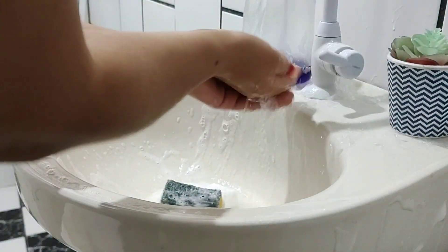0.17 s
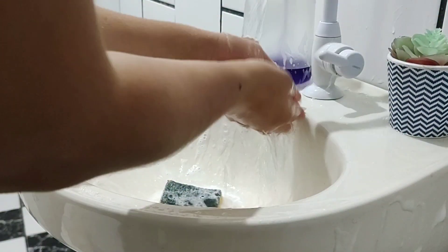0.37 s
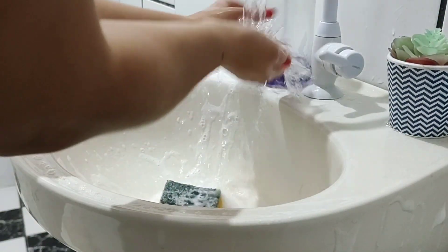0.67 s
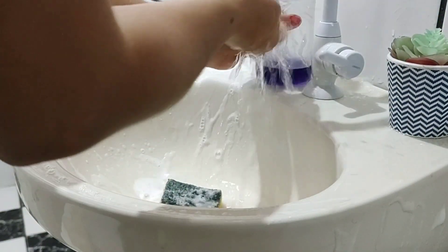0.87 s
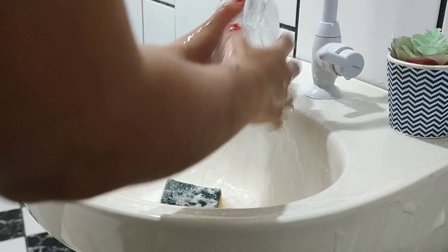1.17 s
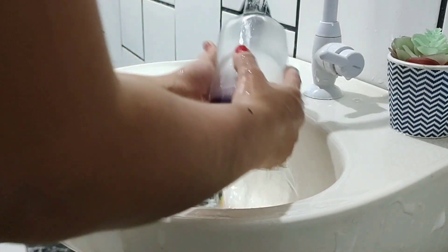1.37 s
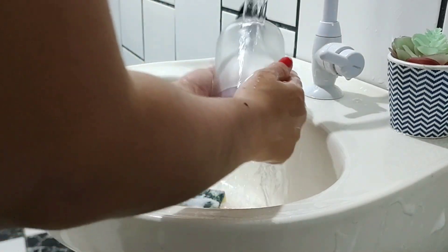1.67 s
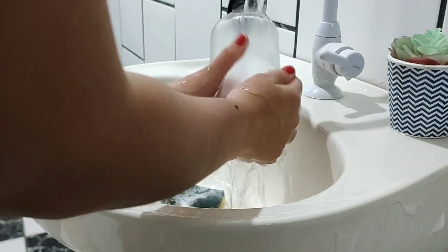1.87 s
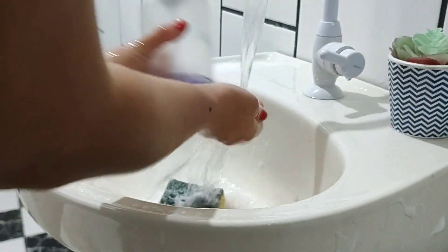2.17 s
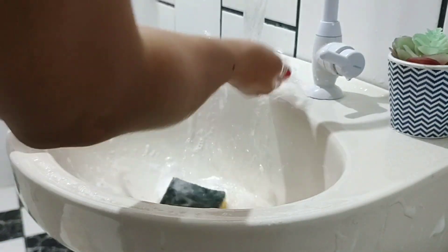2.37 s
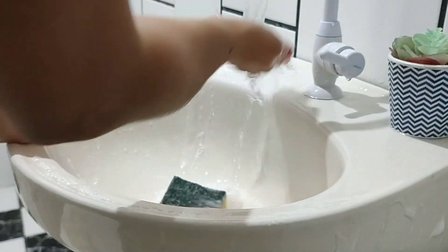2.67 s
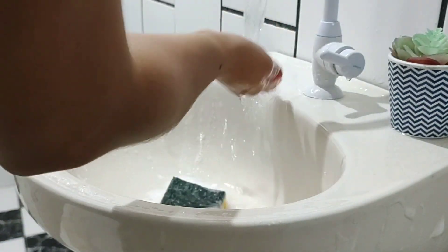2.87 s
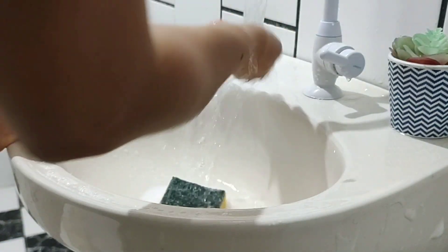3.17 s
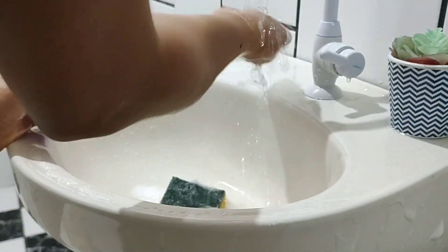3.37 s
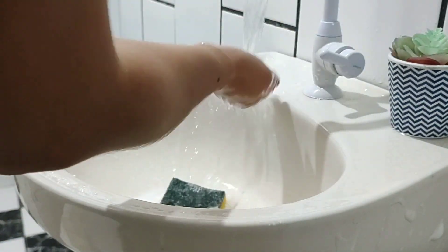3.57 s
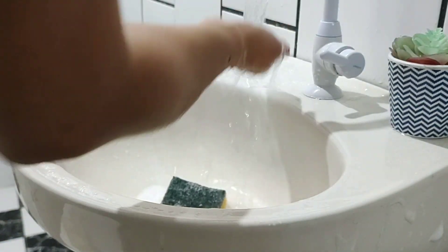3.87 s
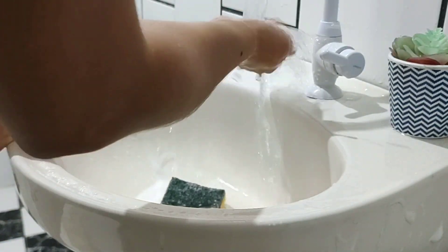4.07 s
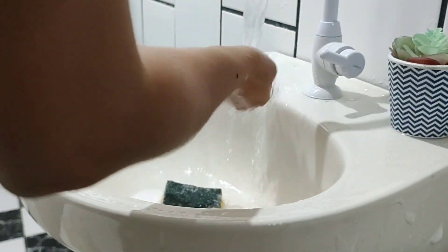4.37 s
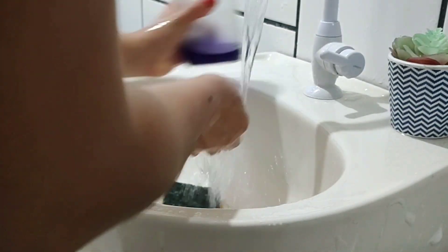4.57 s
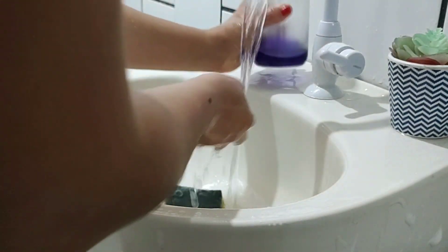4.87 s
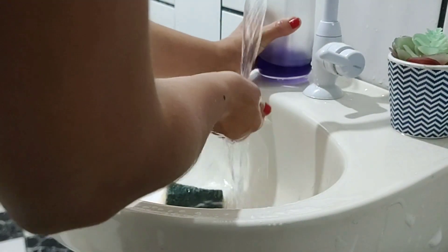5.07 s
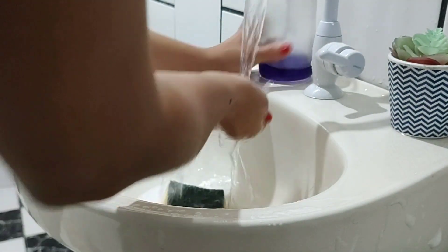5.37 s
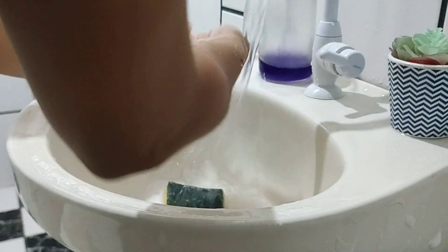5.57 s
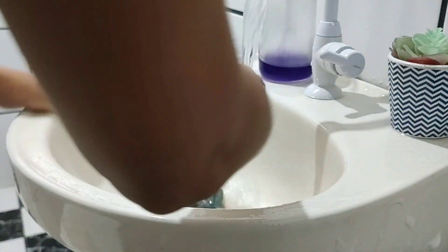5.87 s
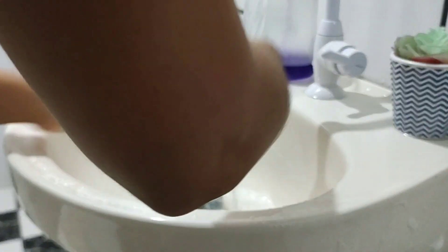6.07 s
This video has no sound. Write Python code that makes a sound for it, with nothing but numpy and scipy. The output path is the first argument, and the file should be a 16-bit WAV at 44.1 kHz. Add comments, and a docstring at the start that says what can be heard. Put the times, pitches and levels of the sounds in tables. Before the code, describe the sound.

Close up in a small tiled bathroom, hands break a stream of tap water, throwing irregular splashes, spray and little bubbles into the basin. A bottle gives a short hollow scrape early on. The water grows lighter, then swells again as the bottle is put down hard, making the sink thud and ring briefly. Low gulps come from the drain, strongest toward the end.

```python
"""Tap water breaks over moving hands and splashes into a ceramic basin in a tiled bathroom. Each splash
is a swell of noisy wash and spray with a froth of tiny ringing bubbles. Drops burst on the glaze, large
bubbles sing, and slugs of water thump the air over the drain in a low gurgle. A soap bottle judders off
the rim and is later set down hard: the basin thuds and the tiles ring on. The plumbing hums faintly."""
import sys
import numpy as np
from scipy import signal
from scipy.fft import rfft, irfft, next_fast_len
from scipy.io import wavfile
from scipy.ndimage import uniform_filter1d, map_coordinates

SR = 44100
rng = np.random.default_rng(int(sys.argv[2]) if len(sys.argv) > 2 else 0)


def put_to_file(sound):
    """Save the sound as 16-bit audio at rate SR, in the file named by the first command-line argument."""
    columns = np.atleast_2d(sound).T  # one column per channel
    safe = np.clip(columns, -1, 1)
    whole_steps = np.round(safe * 32767)
    wavfile.write(sys.argv[1], SR, whole_steps.astype(np.int16))


N = 273861


def amp(db):
    return 10 ** (np.asarray(db) / 20)


def unit_rms(x):
    return x / np.sqrt(np.mean(x ** 2) + 1e-20)


def at_pitch(points, hz):
    """Read (frequency, value) points along a log frequency axis."""
    freqs, values = np.transpose(points)
    return np.interp(np.log(hz + 1), np.log(freqs + 1), values)


def automation(rows):
    """One curve per column after the time, with a value for every sample."""
    times, *columns = np.transpose(rows)
    return [np.interp(np.arange(N) / SR, times, column) for column in columns]


def wobble(rate):
    """A smooth random curve, rate knots a second."""
    return map_coordinates(rng.standard_normal(int(N * rate / SR) + 4), [np.arange(N) * rate / SR])


def swells(start, hold, peak, rise_s, fall_db_per_s):
    """Summed power envelopes: a quick attack, a hold, then a release that falls steadily in dB."""
    grid = np.arange(0, N / SR + .002, .001)
    age = grid - start[:, None]
    released = np.maximum(age - rise_s - np.abs(hold)[:, None], 0)
    gain = np.clip(age / rise_s, 0, 1) * amp(-fall_db_per_s * released)
    return np.interp(np.arange(N) / SR, grid, peak @ gain ** 2)


def filtered(x, response):
    """Shape x with a complex frequency response."""
    size = next_fast_len(x.shape[-1] + SR // 2)
    return irfft(rfft(x, size) * response(np.fft.rfftfreq(size, 1 / SR)), size)[..., :x.shape[-1]]


def resonate(x, modes):
    """Parallel (centre, stage width, gain) resonators, each two band-pass stages for steep skirts."""
    band = lambda f, hz, width: 1j * f * width / (hz * hz - f * f + 1j * f * width)
    return filtered(x, lambda f: sum(amp(db) * band(f, hz, width) ** 2 for hz, width, db in modes))


# Stereo image: (frequency [Hz], left-right correlation [-1..1])
STEREO_IMAGE = [(30, 0.91), (70, 0.55), (130, 0.82), (330, 0.91), (480, 0.79), (700, -0.027),
                (1400, -0.088), (15000, -0.0042)]
def stereo(pair):
    """Two unrelated signals become left and right, centred in the bass and wide above it."""
    angle = lambda hz: np.arccos(np.clip(at_pitch(STEREO_IMAGE, hz), -1, 1)) / 2
    mid, side = filtered(pair, lambda hz: np.array([np.cos(angle(hz)), np.sin(angle(hz))]))
    return np.array([mid + side, mid - side])


def resonant_noise(modes, drive=1):
    """Stereo noise of rms 1: hiss scaled by drive excites the resonators."""
    return unit_rms(stereo(resonate(drive * rng.standard_normal((2, N)), modes)))


def rush(spectrum, patchy_db):
    """Coloured stereo noise of rms 1 that flickers in patches of time and frequency."""
    bins = signal.stft(rng.standard_normal((2, N)), nperseg=256)[2]
    patches = uniform_filter1d(rng.standard_normal(bins.shape[1:]), size=6, axis=0)
    patches = uniform_filter1d(patches, size=5, axis=1)
    pair = signal.istft(bins * amp(patchy_db * unit_rms(patches)), nperseg=256)[1][:, :N]
    return unit_rms(stereo(filtered(pair, lambda hz: amp(at_pitch(spectrum, hz)))))


def blips(start, hz, gain, cycles, rise):
    """Bubble tones: sines that peak after `cycles` periods and climb as the bubble nears the surface."""
    t = np.arange(min(900, int(8 * cycles / hz.min() * SR))) / SR
    age = t * hz[:, None] / cycles
    wave = np.sin(2 * np.pi * hz[:, None] * t * (1 + rise * age / 2)) * age * np.exp(1 - age)
    at = (start * SR).astype(int)[:, None] + np.arange(len(t))
    return np.bincount(at.ravel(), (gain[:, None] * wave).ravel(), N + len(t))[:N]


def swarm(count, hz, octaves, scatter_db, cycles, rise):
    """A stereo cloud of random bubbles, rms 1, scattered around a steady or moving pitch."""
    centre, pair = np.broadcast_to(hz, N), []
    for _ in range(2):
        when, detune, size = rng.random(count), rng.standard_normal(count), rng.exponential(size=count)
        pitch = np.clip(centre[(when * N).astype(int)] * 2 ** (octaves * detune), 100, 15000)
        pair.append(blips(when * N / SR, pitch, amp(scatter_db * np.minimum(size, 3.5)), cycles, rise))
    return unit_rms(stereo(np.array(pair)))


# Reverb of the tiled room: (frequency [Hz], time to fall 60 dB [s])
TILE_DECAY = [(130, 1), (350, 0.63), (900, 0.75), (2000, 0.72), (3200, 0.66), (9000, 0.29)]
def tiles(send):
    """Reflections blur into a noise tail in which each frequency dies at its own speed."""
    hz, t, bins = signal.stft(rng.standard_normal((2, SR)), SR, nperseg=256)
    decay = amp(-60 * t / at_pitch(TILE_DECAY, hz)[:, None])
    tail = stereo(signal.istft(bins * decay, SR, nperseg=256)[1])
    return signal.fftconvolve(send, tail / np.linalg.norm(tail[0]), axes=1)[:, :N]


# Tone of the background noise: (frequency [Hz], relative level [dB])
BACKGROUND_EQ = [(65, -30), (110, 9), (400, 0.5), (620, 0), (1000, 2), (1090, -2), (2160, -13.5),
                 (5530, -11), (13300, -33), (14700, -14), (16000, -1.5)]
def background_noise():
    """A soft, steady background of low room rumble and faint hiss lies under everything."""
    return amp(-67) * rush(BACKGROUND_EQ, patchy_db=1.5)


# Hums of the plumbing: (centre [Hz], stage width [Hz], level [dB])
PIPE_HUMS = [(72.6, 21, -79), (527, 20, -82), (950, 12, -82)]
def pipes():
    """The plumbing hums faintly in narrow bands of noise."""
    return sum(amp(db) * resonant_noise([(hz, width, 0)]) for hz, width, db in PIPE_HUMS)


def gulp_power(cues):
    """Power envelope of gulp-like swells, one per (time, hold, level) cue."""
    start, hold, db = np.transpose(cues)
    return swells(start, hold, amp(db) ** 2, rise_s=0.036, fall_db_per_s=112)


# Swells of a faint hollow tone: (time [s], hold [s], level [dB])
HOLLOW_SWELLS = [(2.307, .04, -64), (2.423, 0.025, -63), (2.55, 0.038, -70.5)]
def hollow_tone(hz=947, width_hz=24):
    """A narrow band of noise swells like a gulp."""
    return np.sqrt(gulp_power(HOLLOW_SWELLS)) * resonant_noise([(hz, width_hz, 0)])


# Resonances of the air over the drain: (centre [Hz], stage width [Hz], relative level [dB])
DRAIN_MODES = [(278, 177, 5), (148, 25, 1), (69, 18, -11)]
# Slugs of water reaching the drain: (time [s], hold [s], level [dB])
DRAIN_GULPS = [(0.07, 0.039, -64.5), (0.31, 0.1, -76), (0.55, 0.03, -63), (0.983, 0.12, -58),
               (1.09, 0.078, -62), (1.32, 0.063, -56), (2.209, 0.073, -59.5), (2.444, 0.025, -74),
               (2.854, 0.028, -70.5), (3.244, 0.14, -67.5), (3.656, 0.033, -63.5), (4.05, 0.046, -74),
               (4.447, 0.025, -65), (4.616, 0.17, -58), (4.79, 0.2, -58.5), (5.214, 0.32, -51),
               (5.678, 0.045, -45.5), (5.78, 0.042, -51.5), (6.017, 0.063, -57)]
def gurgle(floor_db=-81):
    """Uneven slugs of water thump the air over the drain."""
    level = np.sqrt(gulp_power(DRAIN_GULPS) + amp(floor_db) ** 2)
    return level * resonant_noise(DRAIN_MODES, drive=amp(0.35 * wobble(64)))


# Body of the soap bottle: (centre [Hz], stage width [Hz], relative level [dB])
BOTTLE_MODES = [(443, 54, 0.5), (521, 107, -0.5), (780, 340, -0.5), (943, 91, -14), (1145, 220, -14),
                (1915, 150, -9.5)]
# Its judder along the rim: (time [s], scrape level [dB], note level [dB])
SLIDE_LEVELS = [(.945, -58, -74), (.955, -40, -52), (.99, -50, -60), (1.01, -49, -42), (1.04, -36.5, -45),
                (1.065, -43.5, -56), (1.09, -39.5, -57), (1.135, -40.5, -42), (1.15, -45.5, -55),
                (1.25, -93, -85)]
def bottle_slide(note_hz=505):
    """Rough slips on the rim excite the bottle's body, along with a wavering hollow note."""
    t = np.arange(N) / SR
    moving = (t > SLIDE_LEVELS[0][0]) & (t < SLIDE_LEVELS[-1][0])
    scrape = resonant_noise(BOTTLE_MODES, drive=amp(1.2 * wobble(70.3)))
    pitch = note_hz * (1 + .03 * wobble(30))
    note = np.sqrt(2) * np.sin(2 * np.pi * np.cumsum(pitch) / SR) * amp(2.5 * wobble(59.8))
    scrape_gain, note_gain = amp(automation(SLIDE_LEVELS))
    return moving * (scrape_gain * scrape + note_gain * note)


# The bottle landing: (time [s], strength [dB])
BOTTLE_HITS = [(5.229, -5.5)]
# Dull thud of the basin: (centre [Hz], stage width [Hz], gain [dB])
THUD_MODES = [(130, 17, -12), (314, 78, -5.5), (490, 173, -2.5), (657, 91, -12), (800, 450, -4),
              (1925, 420, -6), (2700, 800, -17.5), (3730, 580, -22), (5060, 120, -24)]
# Ringing partials of the basin: (pitch [Hz], level relative to the hit [dB])
RING_MODES = [(326, -33), (411, -30), (447, -27), (793, -31), (855, -28), (887, -29), (1227, -27),
              (1782, -30), (1928, -23), (1965, -24), (2035, -24), (2143, -25), (3149, -32)]
def bottle_landing(attack_s=0.0058, left_lag_s=0.00036):
    """One hard blow on the ceramic gives a broad thud and a shimmering ring, returned separately."""
    t = np.arange(N) / SR
    blows, ring = np.zeros(N), np.zeros((2, N))
    for start, hit_db in BOTTLE_HITS:
        blows[round(start * SR)] = amp(hit_db + 35.5)  # narrow modes pass on little of a single blow
        age = np.maximum(t - start - np.array([[left_lag_s], [0]]), 0)
        attack = 1 - np.exp(-age / attack_s)
        for hz, mode_db in RING_MODES:
            t60_s = 0.54 * (2000 / hz) ** 0.22  # lower modes last longer
            level = amp(mode_db + hit_db + 2.1 * wobble(23) - 60 * age / t60_s)
            ring += attack * level * np.sin(2 * np.pi * (hz * age + rng.random()))
    return resonate(blows, THUD_MODES), ring


def closing_cavity(time_s=3.3, hz=2000, db=-48.5):
    """One closing cavity chirps upward."""
    return blips(np.array([time_s]), np.array([hz]), amp([db]), cycles=3.6, rise=.45)


# Large single bubbles: (time [s], relative level [dB], pitch [Hz])
LARGE_BUBBLES = [(0.067, -50, 827), (0.071, -39, 1410), (0.084, -35.5, 1600), (0.108, -45.5, 793),
                 (0.123, -47, 987), (0.2792, -42, 2320), (0.353, -47, 1400), (0.394, -35, 1900),
                 (0.4264, -41, 1940), (0.4763, -41.5, 1400), (0.647, -39.5, 1650), (1.274, -43, 1114),
                 (1.373, -40.5, 1320), (1.6727, -46, 3820), (1.74, -33, 4440), (1.8068, -35.5, 3280),
                 (1.991, -45.5, 1390), (2.0409, -30.5, 2200), (2.0553, -34, 2260), (2.071, -31.5, 3720),
                 (2.0899, -39, 1690), (2.593, -40, 2350), (2.752, -52.5, 1280), (3.0873, -44.5, 1544),
                 (3.221, -55.5, 1250), (3.87, -53.5, 1240), (3.908, -49, 2280), (4.074, -47.5, 3600),
                 (4.476, -53.5, 1380), (4.5916, -49.5, 1080), (4.6177, -46.5, 1426), (4.654, -48, 1500),
                 (4.689, -46, 1160), (4.752, -43, 1750), (4.931, -40, 3920), (5.025, -42, 3930),
                 (5.1387, -42, 1920), (5.178, -39.5, 4120), (5.614, -38, 1670), (5.937, -40.5, 2300),
                 (6.0224, -35, 2070)]
# Deep bubbles sit right, small ones left: (pitch [Hz], left over right [dB])
BUBBLE_PAN = [(1100, -19.5), (1500, -12.5), (2300, 5), (4000, 12)]
def bubbles():
    """Each large bubble sings once and sheds five weaker ones of nearly its size."""
    start, db, hz = np.transpose(LARGE_BUBBLES)[..., None]
    draws = rng.random((len(start), 3, 6))
    draws[:, :, 0] = [0, .5, 0]  # the parent is on time, in tune and the loudest
    delay_s = .045 * draws[:, 0]
    pitch = hz * 2 ** (0.31 * (draws[:, 1] - .5))
    level = amp(db - 3 - 150 * delay_s - 13 * np.sqrt(draws[:, 2]))
    pan_db = at_pitch(BUBBLE_PAN, hz)
    onsets = (start + delay_s).ravel()
    return np.array([blips(onsets, pitch.ravel(), (level * side).ravel(), cycles=2.33, rise=0.035)
                     for side in amp([pan_db / 2, -pan_db / 2])])


# Drops hitting the glaze: (time [s], relative level [dB], fizz centre [Hz])
GLAZE_DROPS = [(0.054, -32, 3030), (0.251, -34.5, 5180), (0.495, -37, 5500), (0.5298, -29, 6500),
               (0.83, -32.5, 5550), (0.857, -30, 6900), (0.932, -34.5, 5300), (1.6704, -34, 7400),
               (1.7165, -41, 5500), (1.7383, -33, 4580), (1.7864, -39, 10500), (2.0187, -40, 4230),
               (2.1136, -49, 7600), (2.471, -34, 6100), (2.591, -35, 7600), (2.7304, -40, 5600),
               (2.9069, -36, 3900), (3.472, -46, 7700), (3.5573, -42, 5360), (3.575, -43, 7500),
               (3.712, -48, 8000), (3.818, -38.5, 8220), (3.87, -39.5, 7600), (3.9285, -43, 9800),
               (3.9456, -42, 4650), (3.9583, -39, 3960), (3.98, -38.5, 4150), (4.2596, -42, 3230),
               (4.4696, -52, 5300), (5.6335, -30.5, 6270), (5.873, -35, 11400), (5.909, -42, 11900),
               (6.0397, -38.5, 5640), (6.1014, -37, 4200), (6.1285, -49, 3860)]
def drops(slap_t60_s=.006, fizz_t60_s=.055):
    """Each drop bursts in a sharp slap with a brief fizz of its own colour."""
    track, t = np.zeros((2, N + SR)), np.arange(SR // 8) / SR
    for start, db, hz in GLAZE_DROPS:
        slap = amp(-3 - 60 * t / slap_t60_s) * np.sign(rng.standard_normal(len(t)))
        fizz = amp(-7 - 60 * t / fizz_t60_s) * rng.standard_normal((2, len(t)))
        burst = resonate(slap, [(9100, 14700, 0)]) + resonate(fizz, [(hz, 0.39 * hz, 0)])
        at = round(start * SR)
        track[:, at:at + len(t)] += amp(db + 3.5) * burst
    return track[:, :N]


# Wash, the midrange body of the water: (frequency [Hz], relative level [dB])
WASH_EQ = [(240, -37), (400, -1), (607, -13.5), (808, -2.5), (1290, 2), (2410, 3), (3220, -3.5),
           (6580, -10), (9000, -41), (11700, -18), (19800, -120)]
# Spray, its bright top: (frequency [Hz], relative level [dB])
SPRAY_EQ = [(1470, -15.5), (2500, -3), (4680, 2.5), (6110, 3), (10300, 0.5), (12500, -1.5), (14900, -2.5),
            (15500, -5.5)]
# Water running on between splashes: (time [s], wash level [dB], spray level [dB])
TRICKLE_LEVELS = [(0, -63, -57), (.9, -57, -59), (1.6, -58, -61), (1.95, -62, -51), (2.7, -62, -61.5),
                  (3.35, -66, -67), (4.1, -65.5, -62.5), (4.36, -68.5, -66.5), (4.9, -63, -59.5),
                  (5.4, -51, -64), (5.85, -60, -58.5), (6.21, -57, -83)]
# The hands throw the stream onto the glaze:
# (time [s], hold [s], wash level [dB], spray level [dB], froth level [dB], bubble pitch [Hz])
HAND_SPLASHES = [(-.03, 0.052, -45, -50.5, -49, 2430), (0.053, 0.028, -43.5, -44.5, -50, 1690),
                 (0.248, 0.021, -51.5, -51.5, -58.5, 3080), (0.342, 0.077, -48.5, -49.5, -55.5, 1930),
                 (0.401, 0.023, -51.5, -51, -54, 4570), (0.528, 0.033, -52.5, -39.5, -50, 5820),
                 (0.598, 0.068, -50, -48, -54, 1920), (0.687, 0.17, -54.5, -51, -58, 3480),
                 (0.943, 0.27, -57, -59.5, -59.5, 1850), (1.18, 0.101, -49.5, -40.5, -49, 4100),
                 (1.318, .12, -49, -46, -55.5, 1440), (1.46, 0.076, -51.5, -56, -54, 2660),
                 (1.657, 0.088, -57.5, -48.5, -56.5, 4630), (1.789, 0.035, -54.5, -57, -51, 3490),
                 (1.99, 0.092, -55.5, -49.5, -48, 2370), (2.099, 0.098, -48.5, -44, -47.5, 2190),
                 (2.217, 0.12, -53.5, -44, -50.5, 2930), (2.386, .11, -60, -51, -57, 2510),
                 (2.58, 0.017, -81, -56, -64, 3960), (2.713, 0.13, -63.5, -60.5, -68.5, 3570),
                 (2.893, 0.016, -74, -57, -58.5, 4100), (3.054, 0.034, -62, -58.5, -65, 1650),
                 (3.132, 0.022, -70, -61, -61, 4450), (3.548, 0.053, -64.5, -63.5, -61, 2990),
                 (3.697, 0.037, -55.5, -51.5, -50, 3650), (3.767, 0.071, -80, -53.5, -66.5, 4730),
                 (3.932, 0.024, -78, -52.5, -62.5, 4470), (4.228, 0.014, -77, -59, -59.5, 3580),
                 (4.455, 0.081, -65, -59, -63, 4200), (4.595, 0.033, -55, -56, -56.5, 1140),
                 (4.631, 0.16, -58, -55.5, -56, 1556), (4.688, 0.063, -53, -52, -54, 4130),
                 (4.89, 0.077, -55.5, -55.5, -62.5, 4080), (5.127, 0.069, -74, -58.5, -60.5, 2070),
                 (5.211, 0.027, -49, -50.5, -60.5, 4450), (5.529, 0.039, -52.5, -71, -58, 4440),
                 (5.611, 0.063, -72, -52.5, -58.5, 1890), (5.866, 0.054, -55, -50.5, -56, 2580),
                 (5.926, 0.049, -55, -63, -58.5, 2450), (6.02, 0.065, -56, -52.5, -46.5, 2300),
                 (6.092, 0.096, -63, -48.5, -47.5, 3290)]
def splashing_water(attack_s=0.0215, trickle_hz=2960):
    """Each splash lifts wash, froth and spray above the trickle, and all three surge together."""
    start, hold, wash_db, spray_db, froth_db, bubble_hz = np.transpose(HAND_SPLASHES)

    def thrown(peak, fall_db_per_s=126):
        return swells(start, hold, peak, attack_s, fall_db_per_s)

    trickle_wash, trickle_spray = amp(automation(TRICKLE_LEVELS)) ** 2
    trickle_froth = trickle_wash * amp(-7) ** 2
    wash_power = thrown(amp(wash_db) ** 2) + trickle_wash
    froth_power = thrown(amp(froth_db) ** 2) + trickle_froth
    spray_power = thrown(amp(spray_db) ** 2, fall_db_per_s=183) + trickle_spray
    # the froth's pitch leans toward whichever splash or trickle is loudest
    froth_hz = (thrown(bubble_hz * amp(froth_db) ** 2) + trickle_hz * trickle_froth) / froth_power
    surge = amp(1.47 * wobble(15) + 0.28 * wobble(45))
    wash = rush(WASH_EQ, patchy_db=2.5)
    froth = swarm(count=4500, hz=froth_hz, octaves=.33, scatter_db=1.7, cycles=3.6, rise=.015)
    hiss = rush(SPRAY_EQ, patchy_db=1.0)
    crackle = amp(-11) * swarm(count=3000, hz=9500, octaves=.5, scatter_db=3, cycles=.8, rise=0)
    droplets = amp(-6) * swarm(count=2500, hz=5200, octaves=.55, scatter_db=2.3, cycles=5, rise=.015)
    spray = hiss + crackle + droplets
    return surge * (np.sqrt(wash_power) * wash + np.sqrt(froth_power) * froth + np.sqrt(spray_power) * spray)


def scene():
    """Close water and bottle over a quiet bed; the thud is heard mostly through the room's reverb."""
    slide = bottle_slide()
    thud, ring = bottle_landing()
    plinks = drops() + closing_cavity() + bubbles()
    water = splashing_water() + gurgle() + hollow_tone() + plinks
    bottle = slide + amp(-21.5) * thud + ring
    reverb_send = amp(-11) * plinks + amp(-7) * slide + thud
    return water + bottle + tiles(reverb_send) + pipes() + background_noise()


def record(dry, cutoff_hz=15850):
    """The mix leans 1 dB to the right, with a brick-wall cut of the highest treble."""
    return filtered(dry * amp([[-.5], [.5]]), lambda hz: hz < cutoff_hz)


dry = scene()
out = record(dry)
put_to_file(out)
```